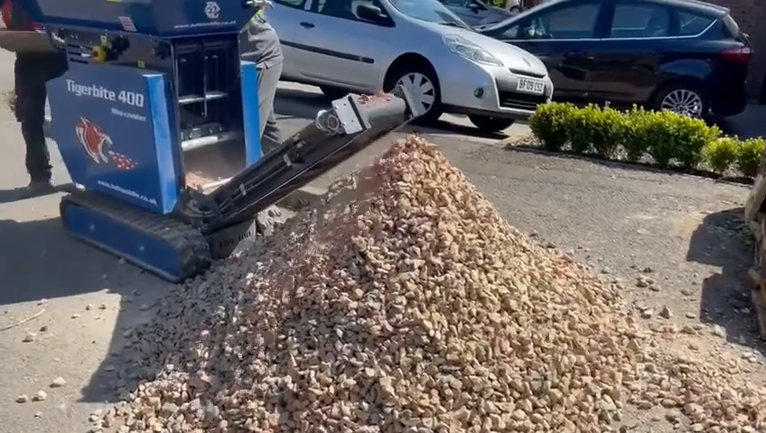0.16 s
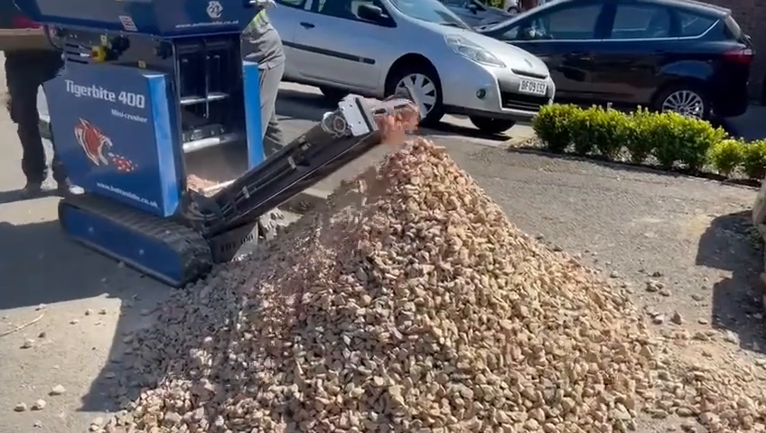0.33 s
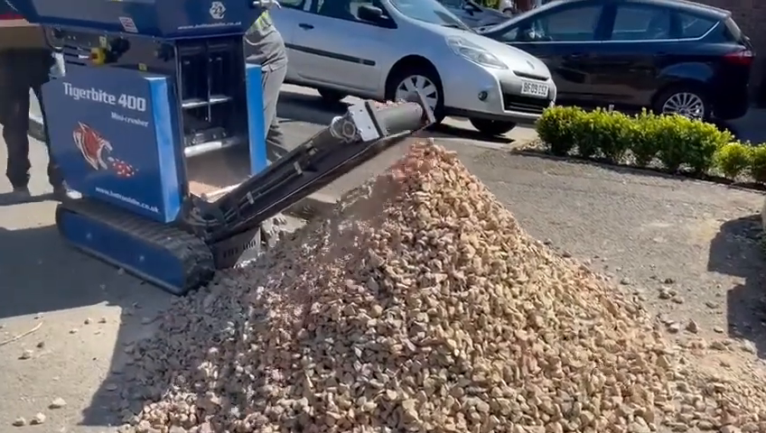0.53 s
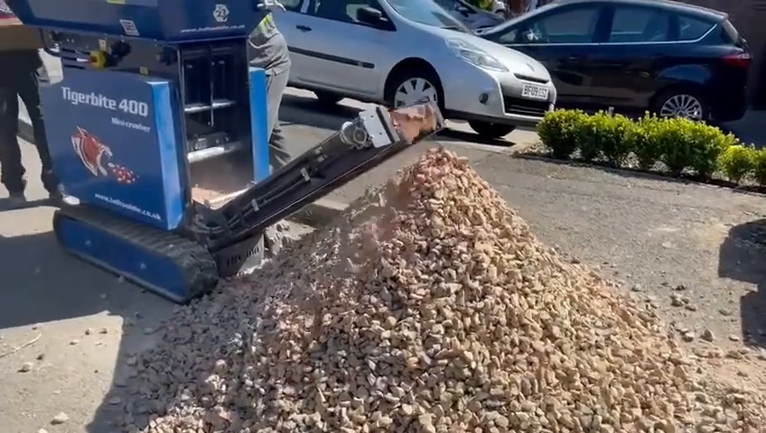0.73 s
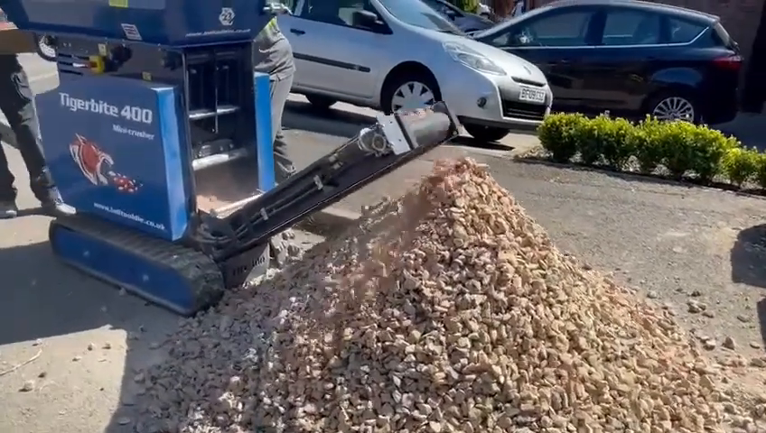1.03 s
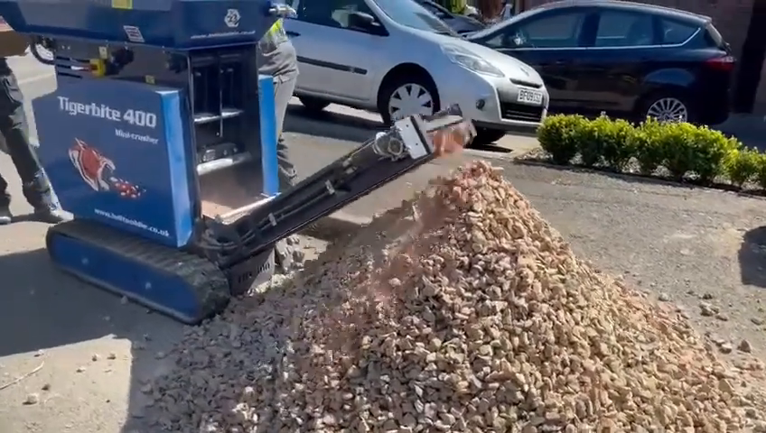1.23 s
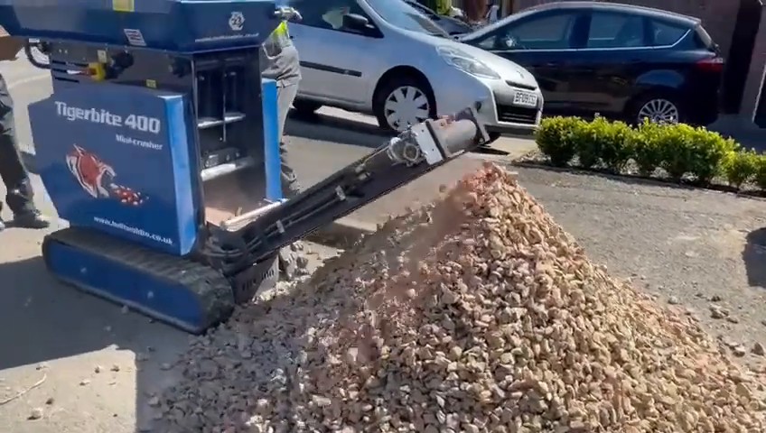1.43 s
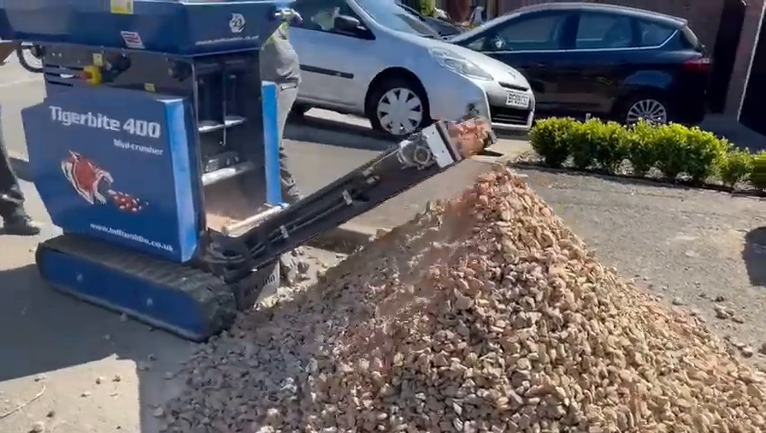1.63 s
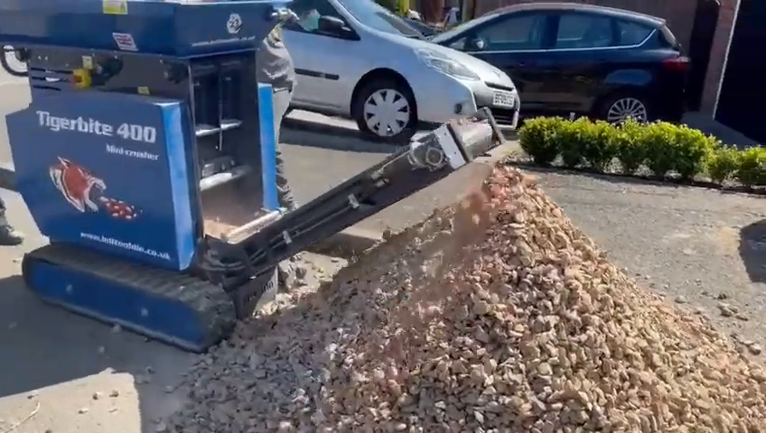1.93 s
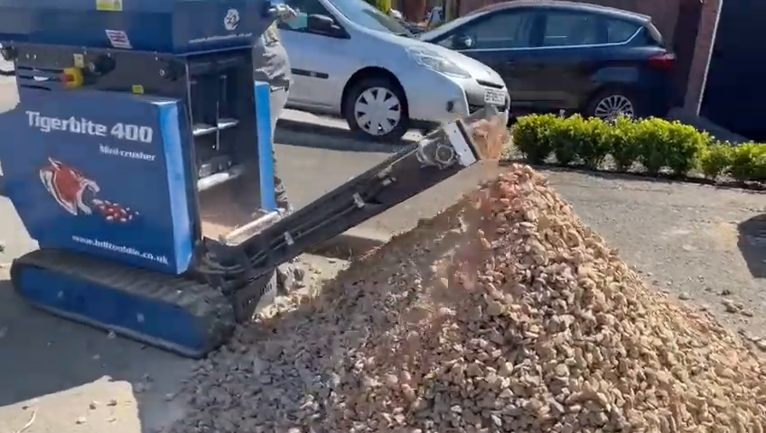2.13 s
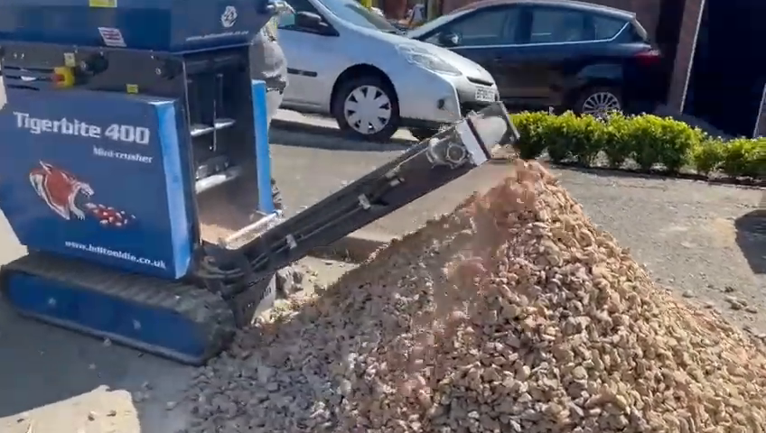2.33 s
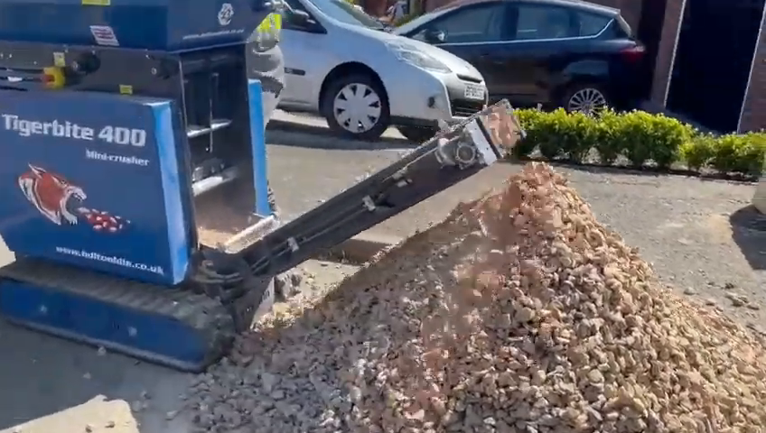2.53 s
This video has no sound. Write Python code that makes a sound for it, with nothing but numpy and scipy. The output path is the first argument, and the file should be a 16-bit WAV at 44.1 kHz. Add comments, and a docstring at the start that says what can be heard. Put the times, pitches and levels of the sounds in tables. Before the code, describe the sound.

A rubble crusher drones loudly outdoors, crunching and thumping as broken stone falls from its belt.

```python
"""An engine drones and roars: a small tracked concrete crusher at full speed, outdoors, a few metres off.
Each engine cycle booms, knocks and puffs. The jaw chews about eleven times a second, crunching rubble.
Now and then a lump cracks and thumps the steel frame, chips snap off, or lumps thud in the hopper.
Crushed stone patters from the belt onto the pile. A pair of microphones picks it up."""
import sys
import numpy as np
from scipy import signal
from scipy.fft import rfft, irfft, next_fast_len
from scipy.io import wavfile
from scipy.ndimage import map_coordinates

SR = 44100
rng = np.random.default_rng(int(sys.argv[2]) if len(sys.argv) > 2 else 0)


def master_out(mix):
    """Clip the mix to full scale and print it as 16-bit PCM to the path in sys.argv[1]."""
    frames = np.transpose(np.atleast_2d(mix))
    ceiling = np.clip(frames, -1, 1)
    pcm = np.round(ceiling * 32767).astype(np.int16)
    wavfile.write(sys.argv[1], SR, pcm)


N = 118188

# Engine speed, sagging under load. Each row: time in seconds, working cycles per second.
CYCLE_RATE_HZ = [(0,26.41),(.65,26.4),(1.1,26.25),(1.7,26.35),(2.15,26.28),(2.55,26.4)]
# Engine and fan lines. Each row: multiple of the cycle rate, relative level in dB.
ENGINE_LINES = [(2,3),(3,0.5),(4,-0.5),(5,-10),(6,-5.5),(7,-6),(8,0),(9,-1),(10,-2.5),(11,-25),(13,-22),(14,-14.5),(15,-18.5),(17,-10.5),(19,-27),(20,-8.5),(25,-14.5),(26,-13.5),(30,-9),(60,-18)]
# Gain curves. Each row: time in seconds, gain in dB.
ENGINE_LOAD_DB = [(0,-2),(.6,-0.5),(1.1,1),(1.5,0),(2.1,1.4),(2.68,2)]
GRIT_FLOW_DB = [(0,0),(.6,-1),(1.1,0.3),(1.5,-0.1),(2.1,-0.1),(2.42,1),(2.68,0)]
PILE_LEVEL_DB = [(0,-49),(.6,-43),(1,-41.5),(1.5,-41.5),(1.85,-37),(2.05,-37.5),(2.3,-42),(2.42,-46),(2.68,-37)]
# Spectral shapes. Each row: frequency in Hz, relative density in dB.
ROAR_SPECTRUM = [(15,-36),(28,-7),(60,-5.5),(90,-4.5),(125,2),(165,-0.5),(215,-3.5),(290,-0.5),(400,-5.5),(520,-7.5),(800,-5.5),(1100,-11.5),(1400,-14),(1680,-11.5),(1880,-20.5),(3000,-29),(6000,-34),(12000,-67)]
CHUG_SPECTRUM = [(120,-11),(200,-10),(280,6.5),(350,-5.5),(600,-33)]
SNAP_SPECTRUM = [(2000,-25),(3500,5),(5000,4),(7200,-1),(8500,-1),(11000,-1)]
CRACK_BODY_SPECTRUM = [(100,-25),(350,-3),(850,0),(1200,-2),(2000,-17),(5000,-40)]
CRACK_EDGE_SPECTRUM = [(800,-38),(2000,-26),(2800,10),(4500,1),(7000,-25),(11000,2)]
GRIT_SPECTRUM = [(300,-60),(1200,12.5),(2000,5.5),(2900,3),(4000,1),(6000,1),(7200,-2.5),(8300,1.5),(9300,1.5),(11000,0),(11500,-7.5)]
# Treble lift of the patter. Each row: frequency in Hz, relative gain in dB.
PATTER_EQ = [(2000,-1),(7000,4),(9500,12)]
# One jaw stroke. Each row: fraction of the stroke, crunch gain in dB.
STROKE_GAIN_DB = [(0,0),(.1,2.5),(.3,2.5),(.5,-0.5),(.7,-1),(.85,0)]
# Stones hit stone or steel. Each row: start in seconds, level in dB, pitch in Hz.
STONE_CLINKS = [(.002,-17,998),(0.791,-20,1230),(1.335,-25,2890),(1.454,-23,3000),(1.572,-26,2910),(2.035,-20,1344),(2.13,-26,2550),(2.205,-23,2720),(2.324,-25,3480),(2.336,-19,3000),(2.338,-32,4740)]
# Lumps shift. Each row: start in seconds, level in dB.
HOPPER_THUDS = [(0.395,-2),(0.928,-9),(1.52,-18),(2.348,-6)]
# The jaw bites a lump. Each row: start in seconds, level in dB, pitch in Hz, t60 in seconds.
JAW_BITES = [(.36,-6,256,0.071),(.7928,-5.5,274,0.059),(.8458,-13,281,0.11),(1.0613,3,281.5,0.076),(1.1554,-5.5,284,.14),(1.245,-8.5,265,0.13),(1.4223,5.5,278,0.063),(1.7789,1.5,296,0.064),(2.0975,-6,276.5,0.12),(2.1447,-3.5,267,0.078),(2.281,-1.5,273,0.055),(2.4877,-20,288,0.051)]
# Frame resonances. Each row: multiple of the pitch, level in dB, fraction of the bite's t60.
FRAME_MODES = [(1,-1.5,0.95),(2.2,-4.5,0.32),(4.1,-27,0.38)]
# Chips break off. Each row: start in seconds, relative level in dB.
CHIP_SNAPS = [(0.3556, -22), (0.4524, -31), (0.4998, -20.5), (0.5377, -21), (0.8924, -20), (0.9822, -19),
              (1.1854, -31), (1.433, -20), (1.5184, -33), (1.5993, -20), (1.9744, -19), (2.0474, -35),
              (2.2444, -21), (2.3326, -16), (2.4952, -21)]
# Lumps break. Each row: start in seconds, level in dB, t60 in seconds, edge over body in dB.
LUMP_CRACKS = [(.003,-22,.06,-18),(.285,-31,.07,-3),(.36,-24,.12,-12),(.885,-27,.09,-3),(.983,-19,.05,-8),(1.061,-8,.065,-12.5),(1.148,-22,.12,-11),(1.335,-27,.08,-3),(1.603,-26,.06,-4),(1.687,-19,.07,-16),(1.87,-28,.12,-4),(2.035,-23,.15,-4.5),(2.13,-28,.08,-2),(2.205,-27,.1,-2),(2.328,-29,.06,-2),(2.495,-23,.07,-8)]
# Stereo likeness. Each row: frequency in Hz, left-right coherence from 0 to 1.
COHERENCE = [(200,.994),(450,.97),(700,.94),(1000,.86),(1500,.68),(2200,.35),(2900,.72),(3700,.35),(4700,.82),(5400,.78),(6300,.96),(7200,.66),(8400,.995),(8850,.995),(9300,.75),(9800,.995),(10550,.995),(11100,.6),(11400,.98)]
# Microphone phase. Each row: frequency in Hz, lead of the left port in radians.
LEFT_LEAD_RAD = [(100,0),(780,.1),(1550,1.25),(2070,3.3),(2500,6.4),(3000,7.3),(3600,7.1),(3950,6.2),(4600,6.45),(6900,6.28),(7500,6.9),(8350,6.28),(8870,6.28),(9730,3.2),(10600,3.1),(11000,2.3),(11350,.1)]
# Microphone balance. Each row: frequency in Hz, left over right in dB.
BALANCE_DB = [(300,0),(900,.3),(1700,0),(2400,3.3),(3200,5),(4200,1.5),(5400,2.5),(6500,.5),(9000,0)]

WHINE_HZ, WHINE_WIDTH_HZ, WHINE_DB = 8280, 22, -55
ROAR_DB, FIRING_DEPTH, FIRING_LAG_TURNS = -20.5, 0.1, 0.36
JAW_HZ, RATTLE_DEPTH, RATTLE_LAG_TURNS = 11.25, 0.091, 0.26
CHUG_DB, CHUG_LAG_CYCLES, CHUG_SHARPNESS = -28, .6, 1.4
EXHAUST_DB, SHAKE_DEPTH, BOOM_TOP_ORDER = -19, 0.043, 5
BOOM_LAG_CYCLES, KNOCK_LAG_CYCLES, TRAIL_CYCLES_PER_ORDER = .04, .555, .07
CLINK_T60_PERIODS, OVERTONE_RATIO, OVERTONE_DB = 110, 1.7, -9.5
PATTER_PER_S, PATTER_HZ, PATTER_RANGE_OCT = 800, 3000, .32 * np.sqrt(2)
PATTER_T60_PERIODS, PATTER_SPREAD_DB = 26, 3.5
THUD_HZ, THUD_T60_S, THUD_ATTACK_S = 127, 0.14, 0.014
FRAME_ATTACK_S = .004
SNAP_GAIN_DB, SNAP_T60_S, SPLINTER_GAIN_DB, SPLINTER_T60_S = -5, .014, -5, .14
HISS_DB, GRAIN_DB, GRAINS_PER_S, GRAIN_SPREAD_DB, GRAIN_T60_S = -32, -38.5, 1300, 5, 0.0017
CLUMP_DB, CLUMPS_PER_S = 2, 40
CEILING, TOP_HZ = .85, 11500


def amp(db):
    """Decibels to gain."""
    return 10 ** (np.asarray(db) / 20)


def unit(x):
    """Scale to rms 1."""
    return x / np.sqrt(np.mean(x ** 2) + 1e-20)


def along(points, hz):
    """Interpolate (Hz, value) rows on a log axis."""
    knots_hz, values = np.transpose(points)
    return np.interp(np.log(hz + 1), np.log(knots_hz + 1), values)


def clock():
    """Sample times in seconds."""
    return np.arange(N) / SR


def curve(rows):
    """Interpolate (seconds, value) rows at every sample."""
    return np.interp(clock(), *np.transpose(rows))


def wobble(knots_per_s):
    """Smooth random curve."""
    return map_coordinates(rng.standard_normal(512), [clock() * knots_per_s], mode="wrap")


def filtered(x, response):
    """Apply a frequency response by FFT."""
    size = next_fast_len(N + 8192)
    return irfft(rfft(x, size) * response(np.fft.rfftfreq(size, 1 / SR)), size)[..., :N]


def spread(pair, spectrum):
    """Two unrelated signals to a coloured stereo pair of rms 1."""
    def mid_side_gains(hz):
        angle = np.arccos(np.clip(along(COHERENCE, hz), 0, 1)) / 2
        return amp(along(spectrum, hz)) * [np.cos(angle), np.sin(angle)]
    mid, side = filtered(pair, mid_side_gains)
    return unit(np.array([mid + side, mid - side]))


def noise(spectrum):
    """Coloured stereo noise of rms 1."""
    return spread(rng.standard_normal((2, N)), spectrum)


def strike(start_s, t60_s, attack_s):
    """Envelope with exponential rise and decay."""
    t = np.maximum(clock() - start_s, 0)
    return amp(-60 * t / t60_s) * (1 - np.exp(-t / attack_s))


def whine():
    """Faint, fuzzy machine whine: a narrow band of noise."""
    band = filtered(rng.standard_normal(N), lambda hz: np.exp(-((hz - WHINE_HZ) / WHINE_WIDTH_HZ) ** 2))
    return amp(WHINE_DB) * unit(band)


def chug(cycles):
    """A rough puff of exhaust with each knock."""
    gate = np.exp(CHUG_SHARPNESS * np.cos(2 * np.pi * (cycles - CHUG_LAG_CYCLES)))
    return amp(CHUG_DB) * unit(gate * noise(CHUG_SPECTRUM))


def roar(cycles):
    """Engine noise pulses with three firings a cycle and rattles at both ends of the jaw's swing."""
    firing = 1 + FIRING_DEPTH * np.cos(2 * np.pi * (3 * cycles - FIRING_LAG_TURNS))
    rattle = 1 + RATTLE_DEPTH * np.cos(2 * np.pi * (2 * JAW_HZ * clock() - RATTLE_LAG_TURNS))
    return amp(ROAR_DB + 0.5 * wobble(9)) * unit(noise(ROAR_SPECTRUM) * firing * rattle)


def exhaust(cycles):
    """Each working cycle gives a deep boom, then a knock; upper lines trail ever further behind."""
    orders = np.arange(100)
    trail_turns = np.cumsum(TRAIL_CYCLES_PER_ORDER * np.maximum(orders - 10, 0))
    lag_cycles = np.where(orders <= BOOM_TOP_ORDER, BOOM_LAG_CYCLES, KNOCK_LAG_CYCLES)
    lag_turns = orders * lag_cycles + trail_turns
    jittered = cycles + .0015 * wobble(14)
    lines = 0
    for order, db in ENGINE_LINES:
        gain = amp(db) * (1 + SHAKE_DEPTH * wobble(9.8))
        lines += gain * np.cos(2 * np.pi * (order * jittered - lag_turns[round(order)]))
    return amp(EXHAUST_DB) * unit(lines)


def jaw_surge():
    """Gain that swells with each jaw stroke."""
    fraction, db = np.transpose(STROKE_GAIN_DB)
    return amp(np.interp(JAW_HZ * clock(), fraction, db, period=1) + 0.9 * wobble(10.3))


def stone_ring(hz, t60_s, t):
    """A stone rings briefly in two modes."""
    modes = np.sin(2 * np.pi * hz * t) + amp(OVERTONE_DB) * np.sin(2 * np.pi * hz * OVERTONE_RATIO * t)
    return modes * amp(-60 * t / t60_s) * (1 - np.exp(-t / 0.0019))


def patter():
    """Small stones land on the pile, each at its own pitch."""
    when, pitch, size, place = rng.random((int(PATTER_PER_S * N / SR), 4)).T[:, :, None]
    hz = PATTER_HZ * 2 ** (PATTER_RANGE_OCT * (2 * pitch - 1))
    steps = np.arange(2048)
    gain = amp(-PATTER_SPREAD_DB * np.log(size + 0.012))
    rings = gain * stone_ring(hz, PATTER_T60_PERIODS / hz, steps / SR)
    indices = ((when * N).astype(int) + steps).ravel()
    pans = np.cos(2 * np.pi * place), np.sin(2 * np.pi * place)
    pair = np.array([np.bincount(indices, (rings * pan).ravel(), N)[:N] for pan in pans])
    return amp(curve(PILE_LEVEL_DB)) * spread(pair, PATTER_EQ) * jaw_surge()


def clinks():
    """Larger stones ring against each other or the steel."""
    return sum(amp(db) * stone_ring(hz, CLINK_T60_PERIODS / hz, np.maximum(clock() - start_s, 0))
               for start_s, db, hz in STONE_CLINKS)


def thuds():
    """Heavy lumps shift in the hopper."""
    out = np.zeros(N)
    for start_s, db in HOPPER_THUDS:
        tone = np.sin(2 * np.pi * THUD_HZ * (clock() - start_s))
        out += amp(db) * strike(start_s, THUD_T60_S, THUD_ATTACK_S) * tone
    return out


def frame_thumps():
    """Bites thump the hollow steel frame, each with its own pitch and damping."""
    out, t = np.zeros(N + SR), np.arange(SR // 5) / SR
    for start_s, db, hz, t60_s in JAW_BITES:
        ring = sum(amp(mode_db - 60 * t / (t60_s * fraction)) * np.sin(2 * np.pi * hz * ratio * t)
                   for ratio, mode_db, fraction in FRAME_MODES)
        out[round(start_s * SR):][:len(t)] += amp(db) * ring * (1 - np.exp(-t / FRAME_ATTACK_S))
    return out[:N]


def snaps():
    """A chip snaps off: a sharp tick and a short spray of splinters."""
    envelope = np.zeros(N)
    for start_s, db in CHIP_SNAPS:
        tick = strike(start_s, SNAP_T60_S, attack_s=0.00037)
        spray = amp(SPLINTER_GAIN_DB) * strike(start_s, SPLINTER_T60_S, attack_s=0.0023)
        envelope += amp(db + SNAP_GAIN_DB) * (tick + spray)
    return envelope * noise(SNAP_SPECTRUM)


def cracks():
    """A lump breaks: a dull burst and a bright edge of splinters."""
    body, edge = np.zeros((2, N))
    for start_s, db, t60_s, edge_db in LUMP_CRACKS:
        body += amp(db) * strike(start_s, t60_s, attack_s=0.00056)
        edge += amp(db + edge_db) * strike(start_s, t60_s, attack_s=0.00086)
    return body * noise(CRACK_BODY_SPECTRUM) + edge * noise(CRACK_EDGE_SPECTRUM)


def rubble():
    """Grit hisses and crackles in the jaw, surging with each stroke."""
    ticks = (rng.random((2, N)) < GRAINS_PER_S / SR) * rng.choice([-1, 1], (2, N))
    size_db = GRAIN_SPREAD_DB * np.minimum(rng.exponential(size=(2, N)), 4)
    sizes = amp(size_db + CLUMP_DB * wobble(CLUMPS_PER_S))
    t = np.arange(256) / SR
    grain = rng.standard_normal((2, len(t))) * amp(-60 * t / GRAIN_T60_S)
    grain = irfft(np.exp(1j * np.angle(rfft(grain))))  # flatten the spectrum
    grains = signal.fftconvolve(ticks * sizes, grain, axes=1)[:, :N]
    crackle = amp(GRAIN_DB) * spread(grains, GRIT_SPECTRUM)
    return jaw_surge() * (amp(HISS_DB) * noise(GRIT_SPECTRUM) + crackle)


def scene():
    """Engine, impacts, crunching rubble and falling stone, in stereo."""
    cycles = np.cumsum(curve(CYCLE_RATE_HZ)) / SR
    engine = exhaust(cycles) + whine() + amp(curve(ENGINE_LOAD_DB)) * (roar(cycles) + chug(cycles))
    impacts = frame_thumps() + thuds() + cracks() + snaps()
    return engine + impacts + amp(curve(GRIT_FLOW_DB)) * rubble() + patter() + clinks()


def record(dry):
    """Two microphone ports differ in phase and level; soft clip, then low-pass."""
    sides = np.array([[.5], [-.5]])
    def ports(hz):
        return np.exp(1j * sides * along(LEFT_LEAD_RAD, hz)) * amp(sides * along(BALANCE_DB, hz))
    heard = filtered(dry, ports)
    rounded = heard / (1 + np.abs(heard / CEILING) ** 8) ** (1 / 8)
    return filtered(rounded, lambda hz: hz < TOP_HZ)


dry = scene()
out = record(dry)
master_out(out)
```